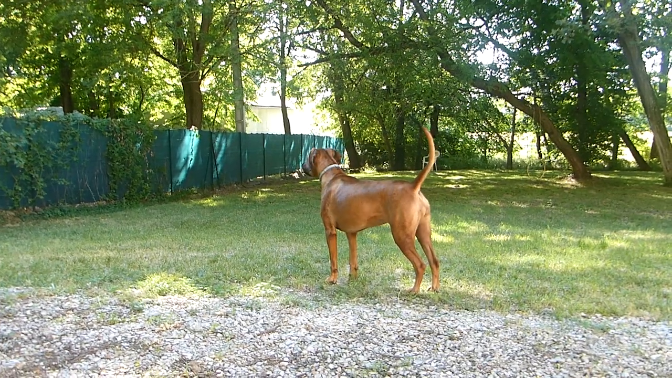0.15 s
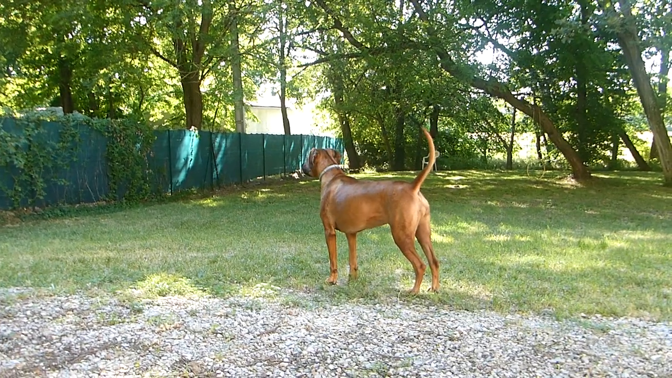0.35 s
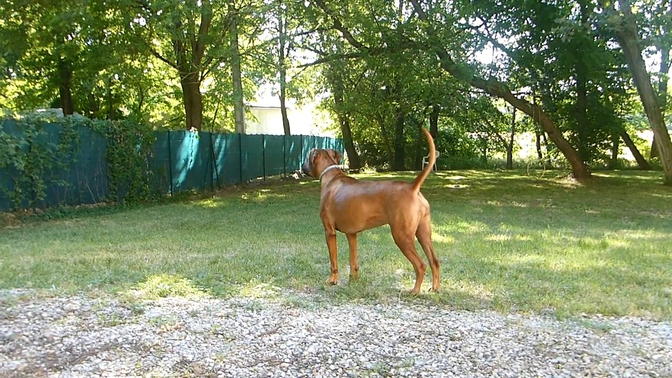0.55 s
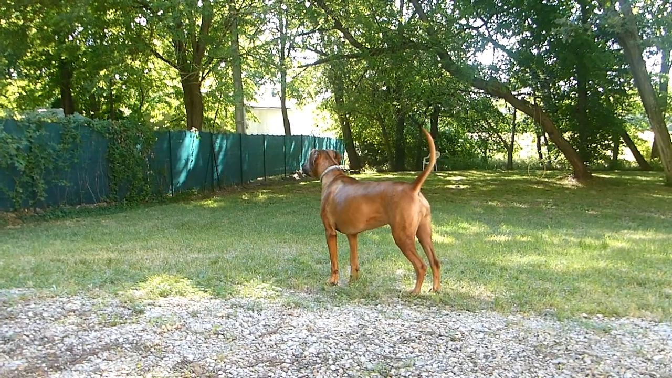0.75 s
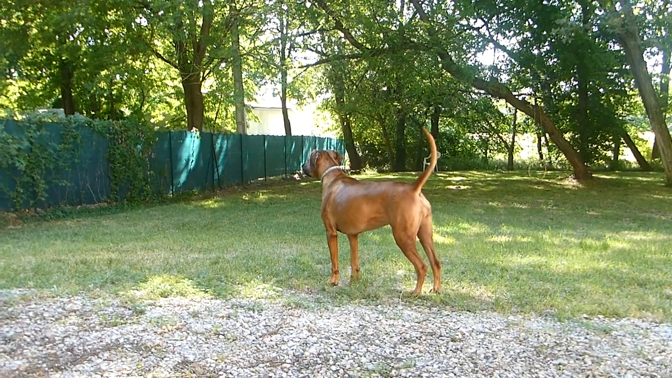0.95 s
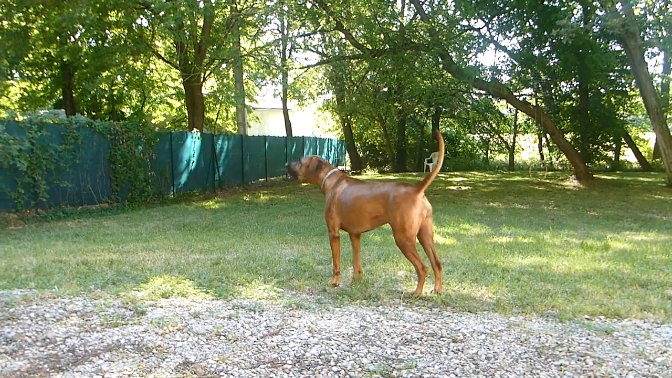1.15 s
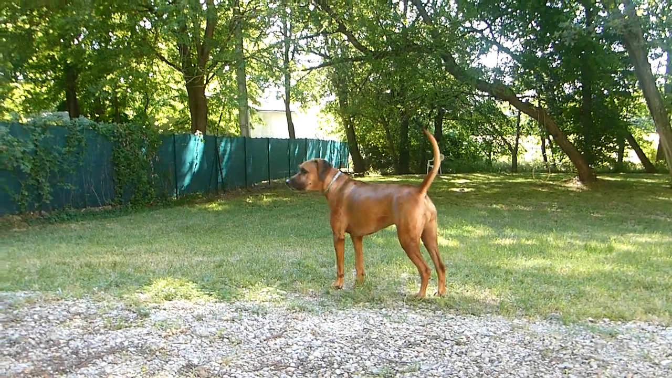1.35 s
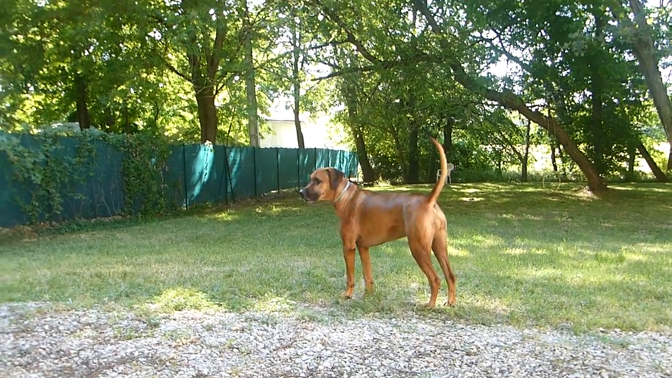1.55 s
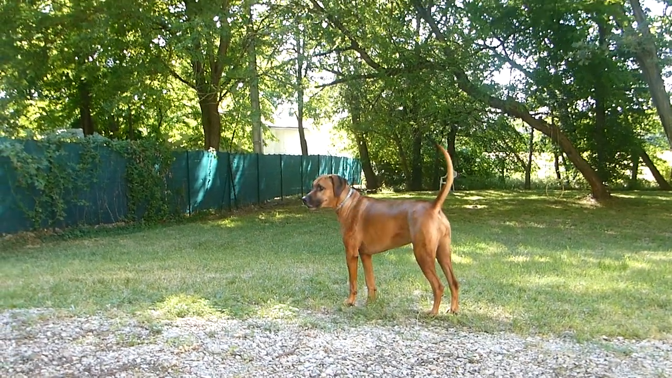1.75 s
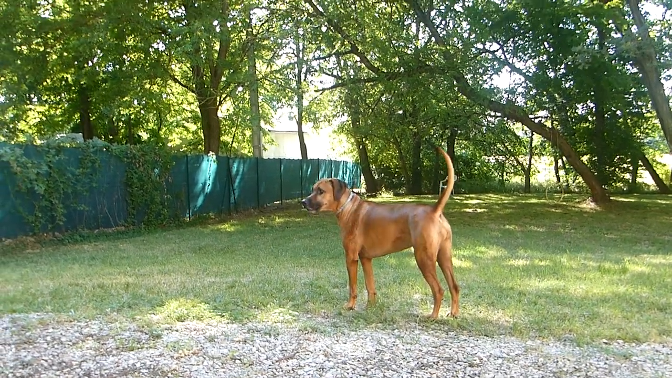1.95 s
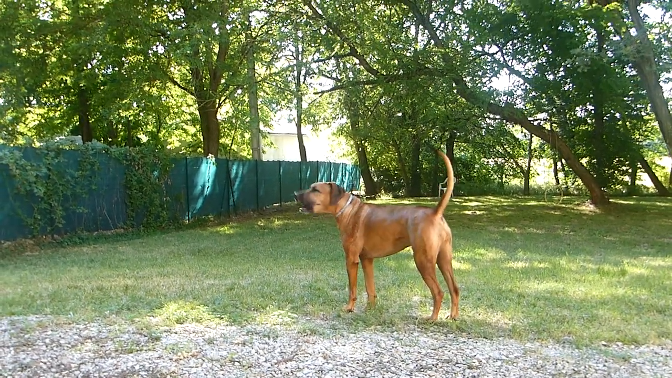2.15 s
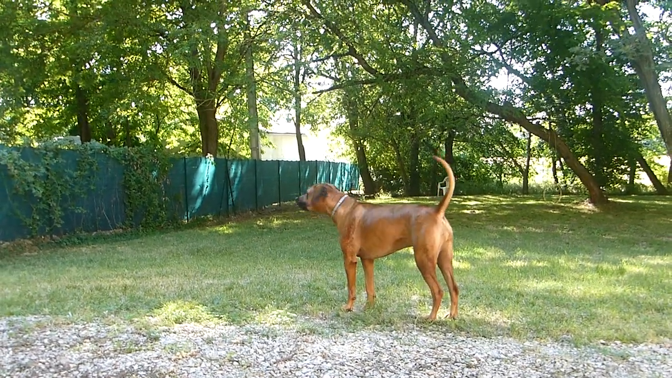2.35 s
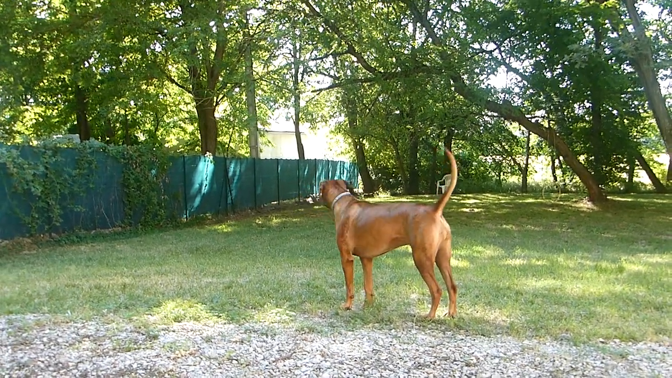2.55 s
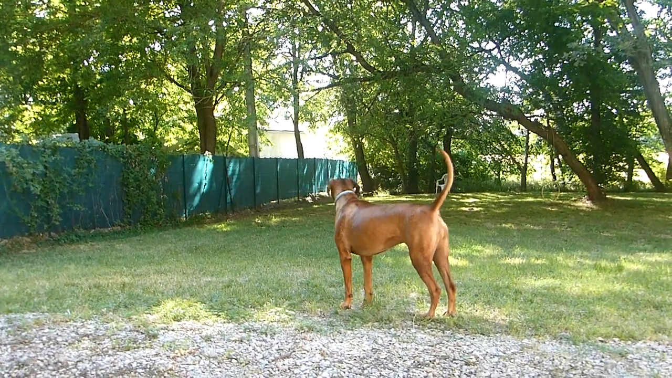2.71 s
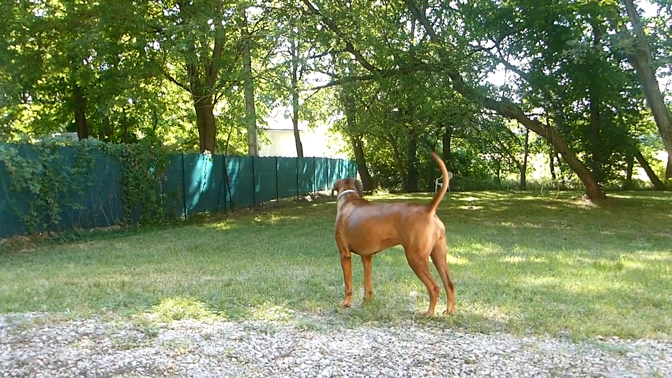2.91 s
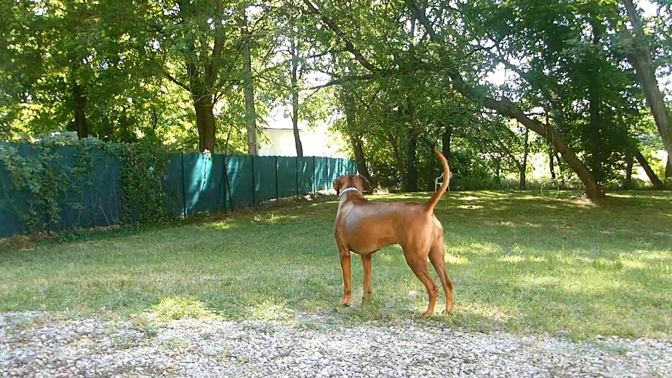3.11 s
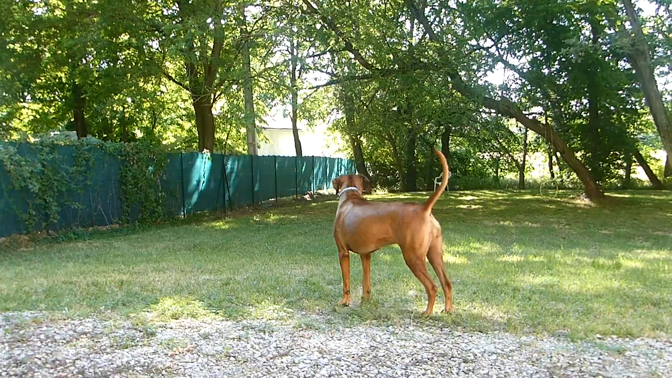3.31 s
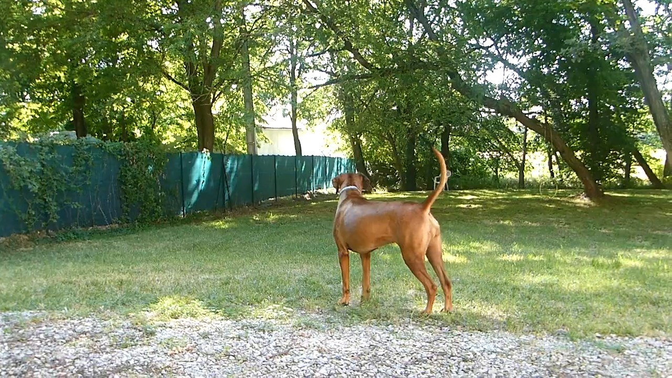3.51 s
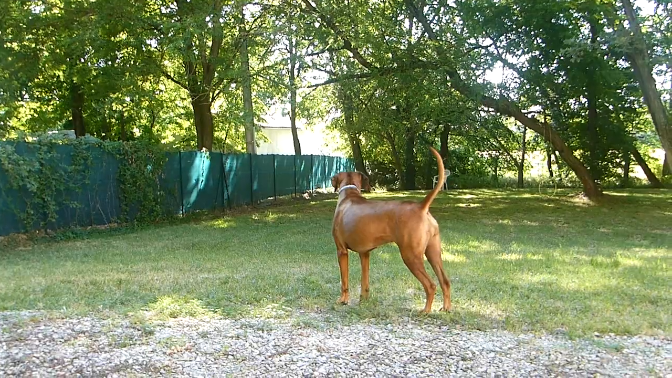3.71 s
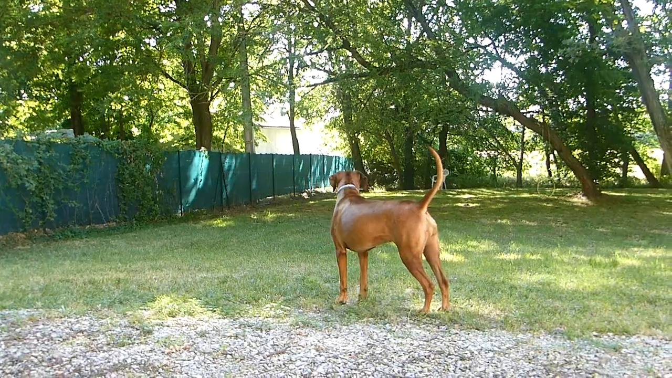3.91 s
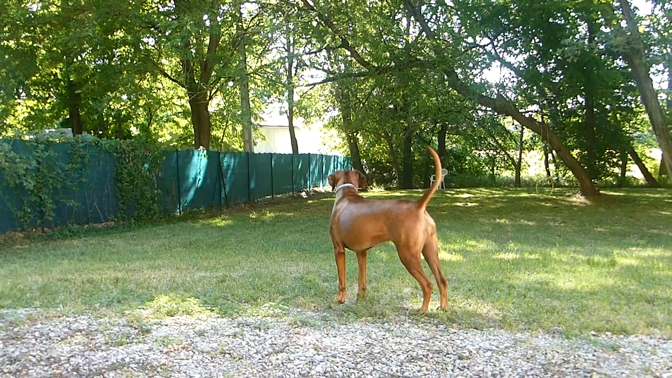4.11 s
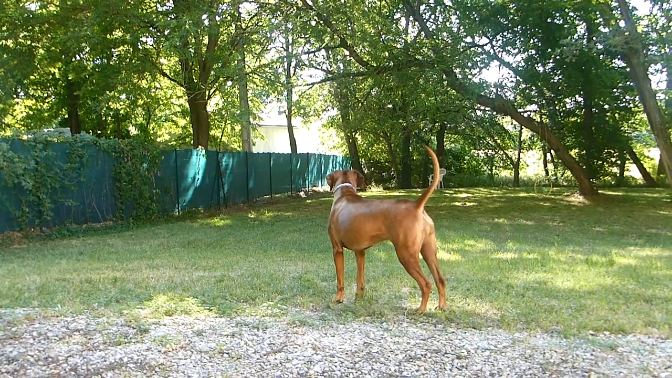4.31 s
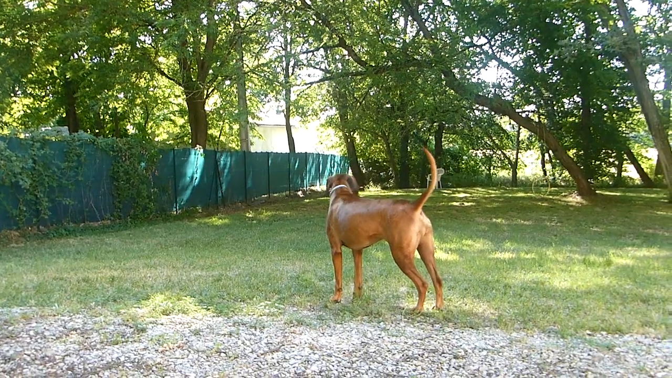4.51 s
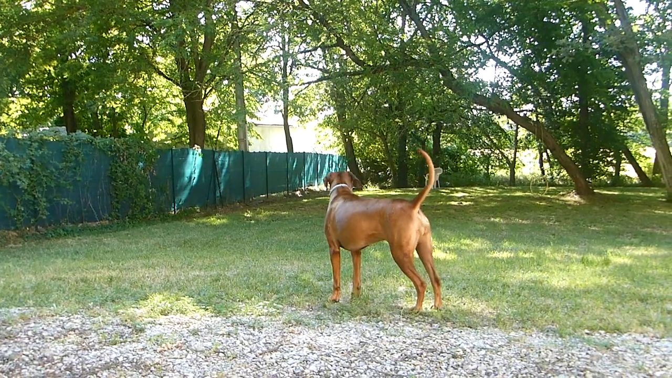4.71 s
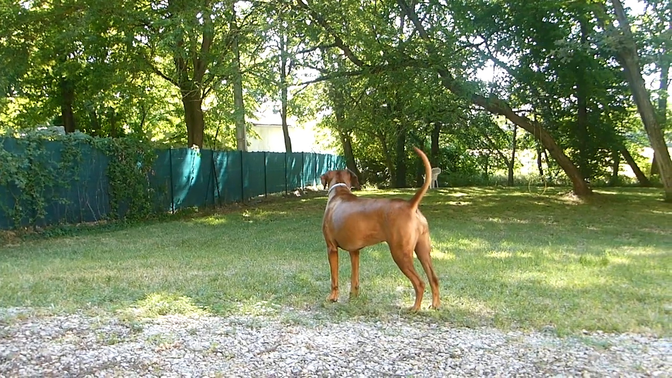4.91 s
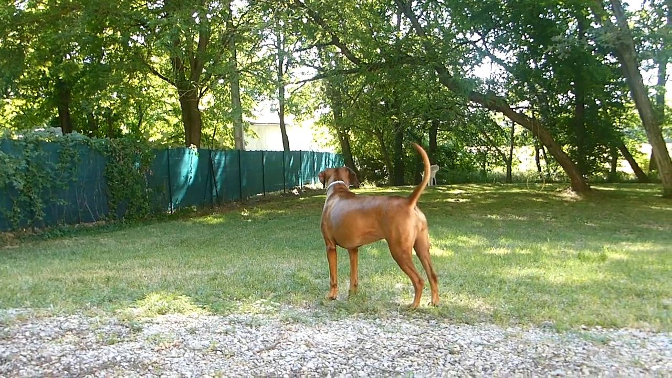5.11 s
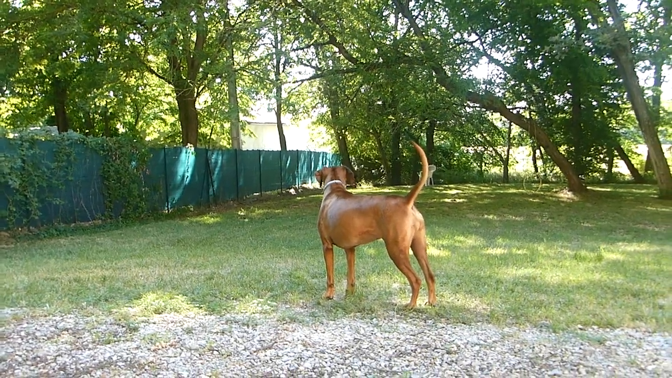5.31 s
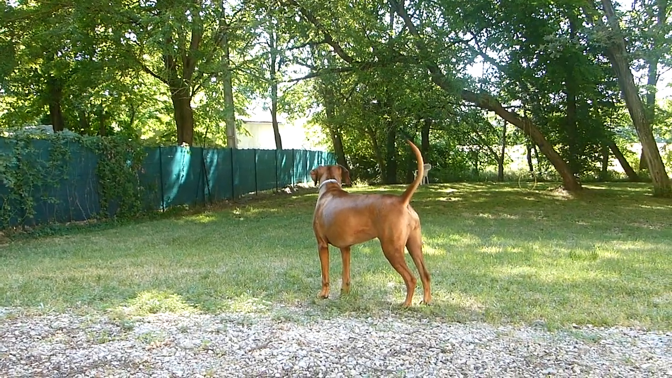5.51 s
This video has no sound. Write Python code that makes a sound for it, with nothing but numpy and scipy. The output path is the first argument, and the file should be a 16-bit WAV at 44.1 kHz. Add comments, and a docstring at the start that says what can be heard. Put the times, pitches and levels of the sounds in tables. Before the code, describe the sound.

Deep, rough barks from one big dog ring across a yard, with soft throaty growls between and a steady faint hiss of leaves.

```python
"""On a lawn a large dog's bark ends and echoes; from 1.1 s it barks four times more, with low growls between.
Barks are harmonics under an arch of pitch through an opening mouth; growls are slow beats in a shut muzzle.
A dull tick falls at 1.5 s, a thin nasal whine (gliding tones) at 2.05 s, far yaps and faint ticks after 5.1 s.
Fence and trees throw all of it back as echoes and scatter, and leaves (shaped noise) hiss throughout.
A gain control holds the loud barks down."""
import sys
import numpy as np
from scipy import signal
from scipy.fft import rfft, irfft, next_fast_len
from scipy.io import wavfile
from scipy.ndimage import uniform_filter1d

SR = 44100
rng = np.random.default_rng(int(sys.argv[2]) if len(sys.argv) > 2 else 0)


def generate_wav(signal):
    """Clip the signal to [-1, 1] and save it as 16-bit WAV at the path in sys.argv[1]."""
    frames = np.transpose(np.atleast_2d(signal))
    scaled = np.clip(frames, -1, 1) * 32767
    pcm = np.round(scaled).astype(np.int16)
    wavfile.write(sys.argv[1], SR, pcm)


N = 249606
LEAD = SR // 2  # samples of sound before 0 s


def gain_of(db):
    """The decibel law: 20 dB is a factor of ten in amplitude."""
    return 10 ** (np.asarray(db) / 20)


def evened(x):
    """Normalisation of power: scales to rms 1."""
    return x / np.sqrt(np.mean(x ** 2) + 1e-20)


def read(points, hz):
    """Interpolation of (Hz, value) points on a logarithmic frequency axis."""
    f, value = np.transpose(points)
    return np.interp(np.log(hz + 1), np.log(f + 1), value)


def add(mix, s, sound):
    """Superposition: adds a sound at time s to a track that starts LEAD samples early."""
    part = mix[max(round(s * SR) + LEAD, 0):][:len(sound)]
    part += sound[:len(part)]


def coloured(x, points):
    """Linear filtering: multiplies the spectrum of x by a curve of (Hz, dB) points."""
    gain = gain_of(read(points, np.fft.rfftfreq(len(x), 1 / SR)))
    return irfft(rfft(x) * gain, len(x))


def wander(count, hz):
    """Low-passed noise: a smooth random course of about rms 1 that moves up to hz times a second."""
    size = next_fast_len(count + SR // 10)
    f = np.fft.rfftfreq(size, 1 / SR)
    noise = rfft(rng.standard_normal(size))
    return evened(irfft(noise / (1 + (f / hz) ** 4)))[:count]


def resonate(x, hz, width):
    """Resonance: shifts hz to zero, low-passes there and shifts back, with gain 1 at the peak."""
    turn = np.exp(2j * np.pi * np.cumsum(hz * np.ones(len(x))) / SR)
    r = np.exp(-np.pi * width / SR)
    return 2 * (turn * signal.lfilter([1 - r], [1, -r], x / turn + 1e-18)).real


# Barks; the first starts before 0 s, so only its end and its echo are heard. Each row: start in seconds,
# length in seconds, effort in dB, top pitch in Hz, time to top pitch in seconds, time to open the jaw in seconds,
# roughness from 0 to 1, brightness of the bite in dB at 2 kHz, brightness after it in dB at 2 kHz, treble toward
# the listener as the head turns in dB at 5 kHz, mouth size as a factor on the throat's resonances.
BARK_ROWS = [(-.15, .125, -20.5, 462.3, .11, 0.025, .35, 4, 3, -8, 0.968),
             (1.102, 0.13, -11.5, 438.9, .064, 0.022, 0.51, 0.5, -2.5, 2, 0.99),
             (2.204, 0.13, -12.5, 428.5, .085, 0.033, 0.61, 5, -2.5, 5, 1.037),
             (2.788, .129, -13, 445, .07, 0.0098, 0.5, 2.5, -2, -9, 0.987),
             (4.434, 0.13, -12.5, 439.9, .088, 0.026, .65, 0.5, -2, -10, 0.997)]


def add_barks(direct, thrown):
    """Directivity: treble beams forward, so a head turned away sends more of it by way of the yard."""
    for s, length, force_db, *shape, facing_db, mouth in BARK_ROWS:
        sound = coloured(bark(length, force_db, shape, mouth), [(40, -18), (120, 0)])
        add(direct, s - LEAD_IN_S, coloured(sound, [(1900, 0.0063), (5000, facing_db)]))
        add(thrown, s - LEAD_IN_S, coloured(sound, [(1900, 0), (5000, -.3 * facing_db)]))


WAVER = .012  # slow bends of the pitch, rms share of it
# A narrow whistle of air past the teeth: Hz at mouth size 1, width in Hz, dB relative to the hiss
TEETH_HZ, TEETH_WIDTH_HZ, TEETH_DB = 4790, 210, -11
# Throat and mouth at size 1, with resonances near 380, 810, 1300 and 2300 Hz.
# Each row: frequency in Hz, relative level in dB.
THROAT_RESPONSE = [(90, -22), (240, -5.5), (365, -3.5), (430, -9), (500, -2), (590, -7.5), (810, 4),
                   (1060, -8.5), (1300, -3.5), (1520, -18), (1750, -27.5), (2020, -19), (2320, -11),
                   (2530, -35.5), (2780, -44), (4200, -49.5)]
# Air rushing past the teeth. Each row: frequency in Hz, relative level in dB per Hz.
RASP_SPECTRUM = [(1500, -39), (3000, 4.5), (3450, -29), (4050, 1.5), (4450, -22), (4850, 2.5), (5700, -2.5),
                 (7500, -7), (11000, -11.5), (15000, -58)]


def bark(length, force_db, shape, mouth, rasp_db=-32.0, rasp_fade_db_per_s=20):
    """Source and filter: harmonics slide through the throat; strain splits and shakes the beat, adding air."""
    t = np.arange(-LEAD_IN_S, length + GRUNT_S, 1 / SR)
    effort_db, hz, rough, bright_db = gesture(t, length, *shape)
    jitter = .012 + .09 * rough ** 2
    bends = WAVER * wander(len(t), hz=25.2) + jitter * wander(len(t), hz=161)
    turns = np.cumsum(hz * (1 + bends)) / SR

    # the jaw is still half shut at the low ends of the arch
    opening = mouth * np.minimum(hz / 340, 1) ** 0.44
    voice = 0
    for k in np.arange(2, 25) / 2:
        # folds that beat strong-weak put unsteady lines halfway between the harmonics
        if k % 1:
            size = 1.4 * rough * wander(len(t), hz=40)
        else:
            size = 1 + rough * wander(len(t), hz=40)
        tilt = np.clip(np.log2(k * hz / 1000), -.4, 1)  # octaves above 1 kHz
        colour_db = read(THROAT_RESPONSE, k * hz / opening) + bright_db * tilt
        voice = voice + size * gain_of(colour_db) * np.cos(2 * np.pi * (k * turns + rng.random()))
    # level out the running power: lung pressure sets the loudness
    voice /= np.sqrt(abs(uniform_filter1d(voice ** 2, size=600)) + 1e-12)

    puffs = (.5 + np.exp(-(turns % 1) / 0.14)) * rng.standard_normal(len(t))
    puffs = coloured(puffs, [(170, -20), (330, 3)])  # little air noise lies under the pitch
    throat = [(f * mouth, db) for f, db in THROAT_RESPONSE]
    hoarse = .5 * rough * evened(coloured(puffs, throat))

    # the rush of air sputters, is strongest as the mouth flies open, and then runs out
    rush_db = 0.15 * bright_db - rasp_fade_db_per_s * abs(t - t[np.argmax(bright_db)])
    sputter_db = 2 * wander(len(t), hz=70)
    hiss = coloured(puffs, RASP_SPECTRUM)
    whistle = gain_of(TEETH_DB) * evened(resonate(hiss, TEETH_HZ * mouth, TEETH_WIDTH_HZ))
    rasp = gain_of(rasp_db + rush_db + sputter_db) * (evened(hiss) + whistle)
    return gain_of(effort_db + force_db) * (voice + hoarse + rasp) * signal.windows.tukey(len(t), .05)


# pitch climbs from START_HZ to its top, settles, and drops into a closing grunt
START_HZ, CLIMB_EASE, SETTLE_HZ, SETTLE_S, GRUNT_HZ = 289.7, 1.15, 393.8, 0.03014, 163.3
# loudness swells as the jaw opens, sags as the air runs out, and is cut off into the grunt
LEAD_IN_S, LEAD_IN_DB_PER_S, ONSET_DB, ATTACK_SHARE, SAG_DB = .035, 900, -12, 0.38, -6.5
RELEASE_S, RELEASE_DB, GRUNT_S, GRUNT_DB = 0.025, -14.5, .085, -26
# brightness at 2 kHz: dull with the jaw shut, a bite as it flies open, then steady
SHUT_DB, BITE_S = -12.5, 0.04
# the voice turns hoarse toward the top of the pitch and clears by the share ROUGH_EASING as it settles
ROUGH_START, ROUGH_EASING = 0.35, 0.26


def gesture(t, length, top_hz, top_s, open_s, roughness, bite_db, held_db):
    """Articulation: breath and jaw set level dB, pitch Hz, roughness and brightness dB at times t of a bark."""
    climb = np.minimum(t / top_s, 1)
    settled = 1 - np.exp(-(np.maximum(t - top_s, 0) / SETTLE_S) ** 2)
    closing = np.clip((t - length) / GRUNT_S, 0, 1)

    hz = top_hz + (START_HZ - top_hz) * (1 - climb) ** CLIMB_EASE + (SETTLE_HZ - top_hz) * settled
    hz = hz + (GRUNT_HZ - hz) * closing

    lead_in_db = LEAD_IN_DB_PER_S * np.minimum(t, 0)
    attack_db = lead_in_db + ONSET_DB * np.exp(-np.maximum(t, 0) / (ATTACK_SHARE * open_s))
    sag_db = SAG_DB * np.clip(t / length, 0, 1) ** 4
    release_db = np.interp(t - length, [0, RELEASE_S, GRUNT_S], [0, RELEASE_DB, GRUNT_DB])

    jaw = np.clip(t / open_s, 0, 1) ** 2 * (1 - closing ** 2)
    open_db = held_db + (bite_db - held_db) * np.exp(-(np.maximum(t - open_s, 0) / BITE_S) ** 2)
    bright_db = SHUT_DB + (open_db - SHUT_DB) * jaw

    rough = ROUGH_START + (roughness - ROUGH_START) * np.maximum(climb, 0) ** 2
    rough = np.clip(rough * (1 - ROUGH_EASING * settled), 0, 1)
    return attack_db + sag_db + release_db, hz, rough, bright_db


GROWL_HZ = 73  # mean beat rate of the folds
GROWL_ATTACK_S, GROWL_SWELL_S, GROWL_RELEASE_S = 0.038, 0.15, 0.0075
# Resonances with the mouth shut, each passed twice.
# Each row: frequency in Hz, width of one pass in Hz, relative level in dB.
MUZZLE_RESONANCES = [(160.7, 69.3, -5), (209.3, 74, -1), (282.5, 65, -4.5), (359, 25.7, 6), (662, 63, -8),
                     (965, 572, -41)]
# The shut muzzle swallows the depths and the gap between its resonances. Each row: frequency in Hz, gain in dB.
MUFFLE_RESPONSE = [(60, -16), (140, 1.5), (380, 0.5), (490, -3.5), (650, -0.5), (900, 4)]
# Growls that hold their level, then swell into a bark or die away.
# Each row: start in seconds, length in seconds, held level in dB, closing swell in dB.
GROWL_ROWS = [(1.052, .08, -63, 36), (1.24, .075, -43.5, -6), (2.016, 0.21, -54.5, 30.5),
              (2.39, .405, -46, 19), (2.97, 1.12, -41, -10.5), (4.051, .4, -42, 6.5),
              (4.58, .1, -36.5, -4.5)]


def growls(jitter=.17, hoarse=.6):
    """Pulse excitation: slow, slightly uneven beats of the folds ring the shut muzzle."""
    for s, length, db, swell_db in GROWL_ROWS:
        t = np.arange(0, length, 1 / SR)
        turns = np.cumsum(GROWL_HZ * (1 + jitter * wander(len(t), hz=50.73))) / SR
        beats = np.diff(np.floor(turns), prepend=0) * rng.uniform(0.064, 1, len(t))
        drive = evened(beats) + hoarse * rng.standard_normal(len(t))
        voice = 0
        for hz, width, ring_db in MUZZLE_RESONANCES:
            voice = voice + gain_of(ring_db) * resonate(resonate(drive, hz, width), hz, width)
        voice = evened(coloured(voice, MUFFLE_RESPONSE))
        gate = np.minimum(np.minimum(t / GROWL_ATTACK_S, (length - t) / GROWL_RELEASE_S), 1)
        level_db = db + swell_db * np.exp((t - length) / GROWL_SWELL_S)
        yield s, gate * gain_of(level_db) * voice


WHINE_AT_S, WHINE_S, WHINE_DB = 2.05, .17, -55.5  # level before the swell
WHINE_HZ, WHINE_RISE_HZ_PER_S = 2350, 1400


def whine(overtone=1.0):
    """Frequency modulation: a thin, wavering nasal whistle that swells as the dog gathers itself."""
    t = np.arange(0, WHINE_S, 1 / SR)
    hz = WHINE_HZ + WHINE_RISE_HZ_PER_S * t
    angle = 2 * np.pi * np.cumsum(hz * (1 + .035 * wander(len(t), hz=300))) / SR
    swell = np.sqrt(t / WHINE_S) * signal.windows.tukey(len(t), .3)
    tone = evened(np.sin(angle) + overtone * np.sin(2 * angle))
    return WHINE_AT_S, gain_of(WHINE_DB) * swell * tone


# Small dull ticks and crackles. Each row: start in seconds, peak level in dB, ring in Hz.
TICK_ROWS = [(1.49, -26, 670), (5.32, -51, 2980), (5.533, -46, 1270)]


def ticks(decay_s=0.011):
    """Impulsive noise: a decaying burst through a broad band around the ring is a brief, dull crackle."""
    t = np.arange(SR // 20) / SR
    for s, db, hz in TICK_ROWS:
        burst = rng.standard_normal(len(t)) * np.exp(-t / decay_s)
        band = signal.butter(2, [hz / 2, hz * 1.6], "bandpass", fs=SR, output="sos")
        snap = signal.sosfilt(band, burst)
        yield s, gain_of(db) * snap / abs(snap).max()


# Short yaps of a dog far away. Each row: start in seconds, level in dB, pitch in Hz, length in seconds.
YAP_ROWS = [(5.176, -60.5, 992, 0.096), (5.271, -63, 978, 0.045), (5.598, -56.5, 824, 0.026)]


def yaps():
    """Loss over distance: only the strongest resonance of a bark is left, one wavering tone."""
    for s, db, hz, length in YAP_ROWS:
        count = int(length * SR)
        angle = 2 * np.pi * np.cumsum(hz * (1 + 0.074 * wander(count, hz=121.2))) / SR
        yield s, gain_of(db) * evened(np.hanning(count) * np.sin(angle))


# The dog stands a little to the left. Each row: frequency in Hz, left minus right in dB.
EAR_BALANCE = [(130, -.5), (260, 0), (500, 5.5), (1000, 1.5), (5000, 4.5)]


def to_ears(direct):
    """Interaural level difference: half the balance is added on the left and half taken on the right."""
    return np.array([coloured(direct, [(hz, side * db / 2) for hz, db in EAR_BALANCE]) for side in (1, -1)])


# Ground, fence and tree trunks. Each row: delay in seconds, left level in dB, right level in dB.
ECHO_ROWS = [(.0037, -13, -16.5), (.021, -20.5, -9), (.066, -16, -32), (0.089, -18, -14),
             (.135, -22.5, -26.5)]
# Reverberation time of the scatter. Each row: frequency in Hz, time to fall 60 dB in seconds.
SCATTER_T60 = [(150, 0.5), (400, 0.73), (800, 0.95), (1400, 1.05), (2300, 0.92), (5000, 1.3), (12000, 0.17)]
# Colour of the scatter. Each row: frequency in Hz, relative level in dB.
SCATTER_COLOUR = [(120, 2), (300, -31), (490, 8), (630, 1.5), (840, 5), (1050, -8.5), (1400, 4), (1900, 6),
                  (2500, -1), (5200, 4), (8000, 8.5), (12000, -16)]


def yard(x, wet_db=-10.0, same=0.58, build_s=0.029):
    """Reverberation: a few distinct echoes and dense scatter from the trees, each band dying at its own speed."""
    signs = rng.choice([-1., 1.], (3, 2 * SR))
    taps = signs * (rng.random((3, 2 * SR)) < 3000 / SR)  # about 3000 arrivals a second
    taps = np.sqrt(same) * taps[2] + np.sqrt(1 - same) * taps[:2]  # partly shared by both ears
    hz, t, z = signal.stft(taps, SR, nperseg=256)
    decay_db = -60 * t / read(SCATTER_T60, hz)[:, None]
    z = z * (1 - np.exp(-t / build_s)) * gain_of(read(SCATTER_COLOUR, hz)[:, None] + decay_db)
    tail = signal.istft(z, SR, nperseg=256)[1]
    tail *= gain_of(wet_db) / np.linalg.norm(tail[0])
    for delay, left_db, right_db in ECHO_ROWS:
        tail[:, round(delay * SR)] += gain_of([left_db, right_db])
    return signal.fftconvolve(x[None], tail, axes=1)[:, :len(x)]


AIR_DB = -52.5  # rms level
# Leaves and far-off hum. Each row: frequency in Hz, relative level in dB per Hz.
AIR_SPECTRUM = [(15, -45), (25, -19), (56, -24), (173, -3.5), (209, -5), (399, -11), (469, -5.5),
                (597, -7.5), (665, -5), (995, -4), (1200, -9), (2420, -20.5), (4140, -18), (9030, -19),
                (15500, -34)]
# Likeness of left and right in the air. Each row: frequency in Hz, correlation from -1 to 1.
AIR_LIKENESS = [(60, 1), (240, 0.51), (950, -0.4), (3770, 0.66), (15000, 0.51)]


def air():
    """Diffuse stationary noise: leaves and far-off hum as a soft steady hiss, partly alike at both ears."""
    frames, hz = N // 256 + 5, np.fft.rfftfreq(1024, 1 / SR)
    a, b, c, d = rng.standard_normal((frames, 513, 4)).T
    same = read(AIR_LIKENESS, hz)[:, None]
    left, other = a + 1j * b, c + 1j * d
    z = np.array([left, same * left + np.sqrt(1 - same ** 2) * other])
    z *= gain_of(read(AIR_SPECTRUM, hz)[:, None])
    hiss = signal.istft(z, nperseg=1024, noverlap=768)[1][:, :N]
    return gain_of(AIR_DB) * evened(hiss)


def scene():
    """Superposition of direct sound a little left of centre, the yard's answer and the air."""
    direct, thrown = np.zeros((2, LEAD + N))
    add_barks(direct, thrown)
    for s, sound in [*growls(), whine(), *ticks(), *yaps()]:
        add(direct, s, sound)
        add(thrown, s, sound)
    return (to_ears(direct) + yard(thrown))[:, LEAD:] + air()


EDGE_HZ = 15450  # upper band limit


def record(dry, threshold_db=-17, peak_fall_db_per_s=9, strength=0.23):
    """Compression: gain dips by a share of the held excess and creeps back; then a small offset and low-pass."""
    power_db = 10 * np.log10(abs(uniform_filter1d((dry ** 2).mean(0), size=300)) + 1e-12)
    fall_db = np.arange(N) * peak_fall_db_per_s / SR
    held_db = np.maximum.accumulate(power_db + fall_db) - fall_db  # peaks, held and slowly falling
    over_db = np.maximum(held_db - threshold_db, 0)
    ducked = dry / gain_of(strength * uniform_filter1d(over_db, size=200))
    low_pass = signal.firwin(511, EDGE_HZ, window=("kaiser", 9), fs=SR)
    return signal.oaconvolve(ducked - .003, low_pass[None], "same")  # the converter's offset is .003


dry = scene()
out = record(dry)
generate_wav(out)
```